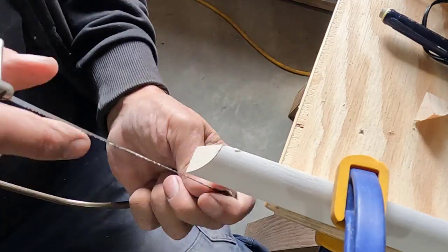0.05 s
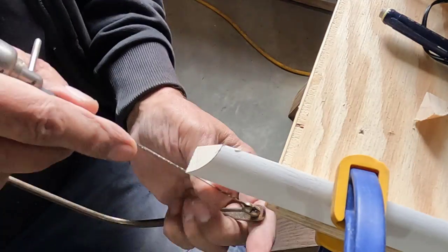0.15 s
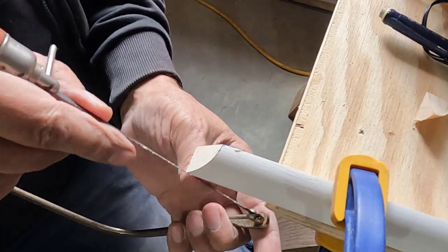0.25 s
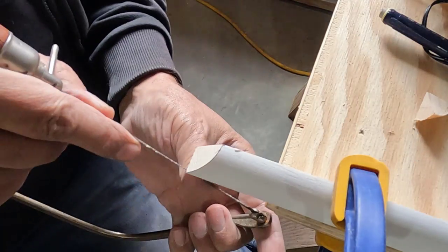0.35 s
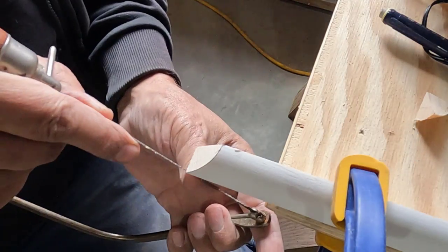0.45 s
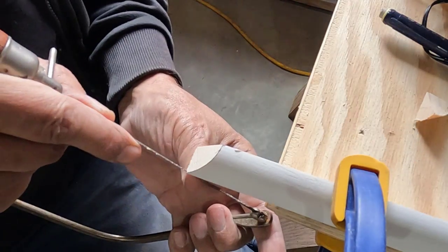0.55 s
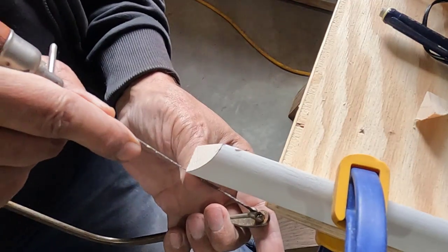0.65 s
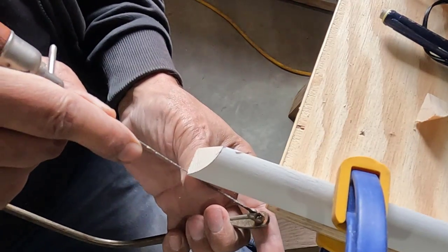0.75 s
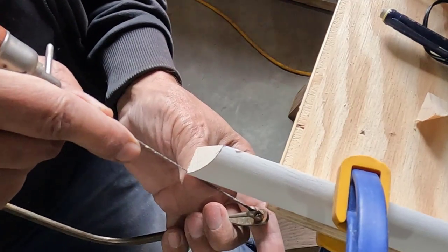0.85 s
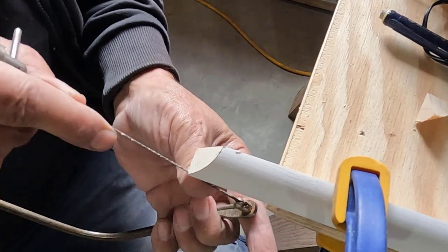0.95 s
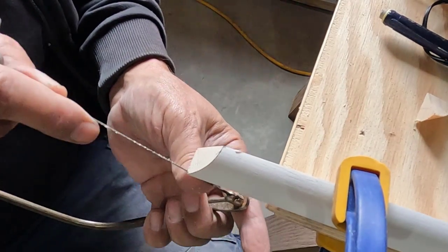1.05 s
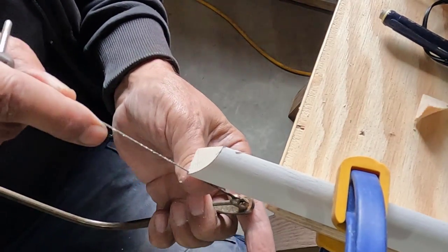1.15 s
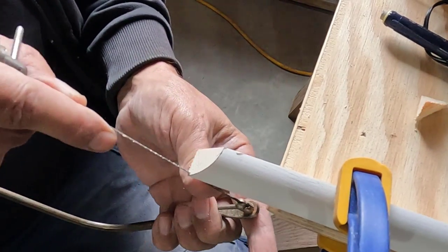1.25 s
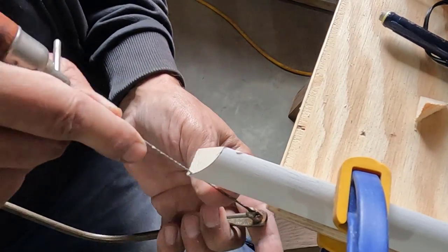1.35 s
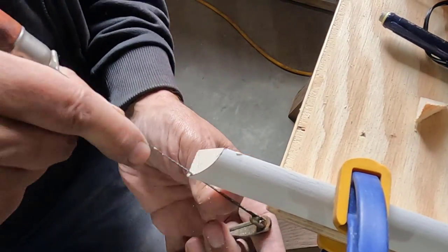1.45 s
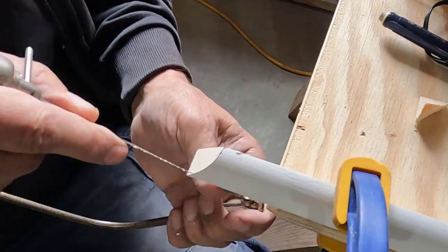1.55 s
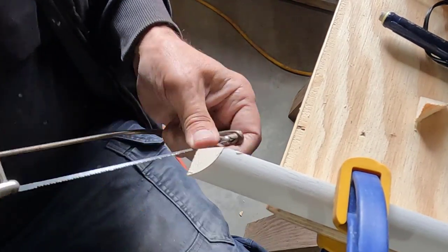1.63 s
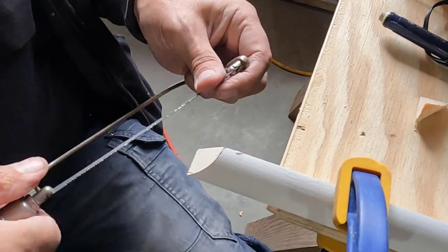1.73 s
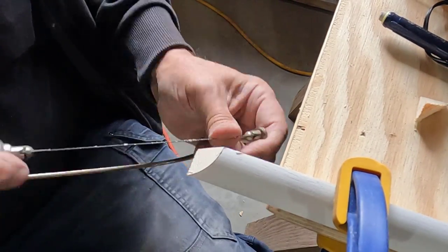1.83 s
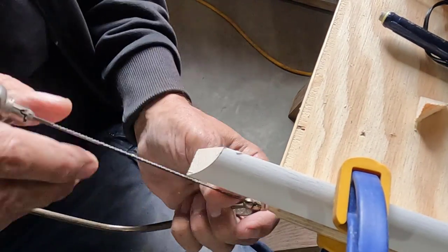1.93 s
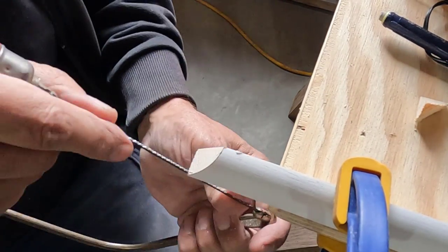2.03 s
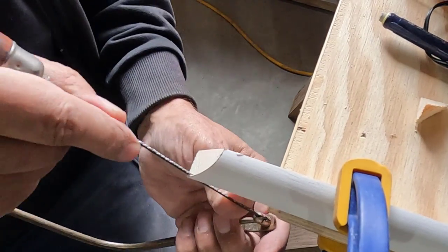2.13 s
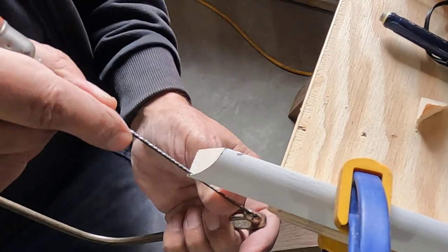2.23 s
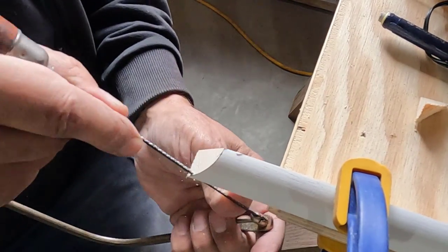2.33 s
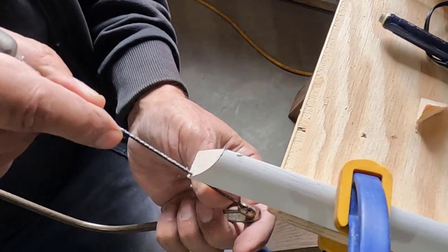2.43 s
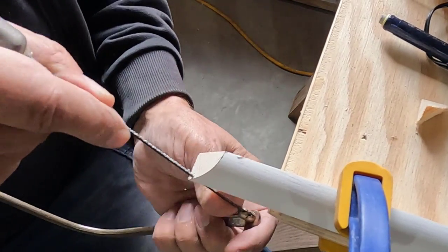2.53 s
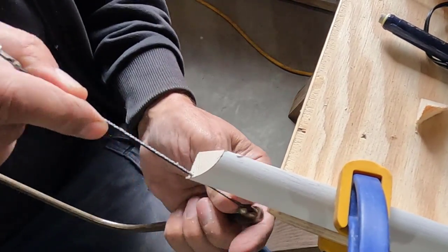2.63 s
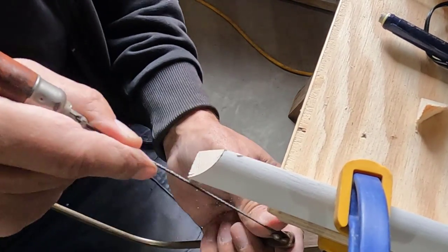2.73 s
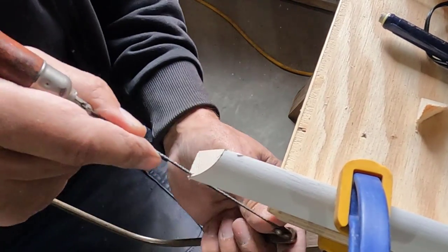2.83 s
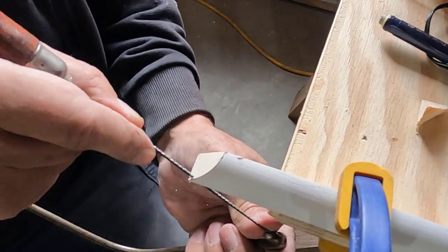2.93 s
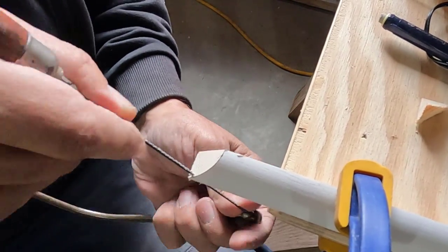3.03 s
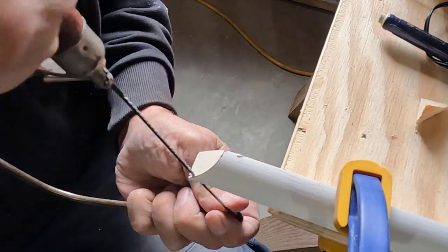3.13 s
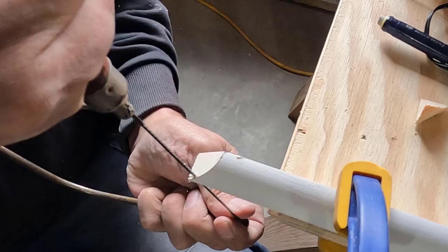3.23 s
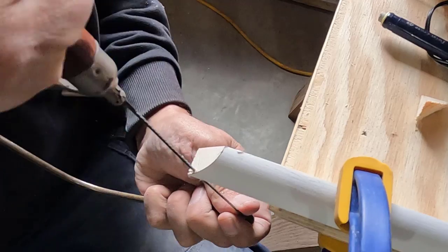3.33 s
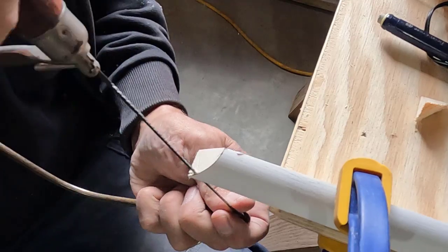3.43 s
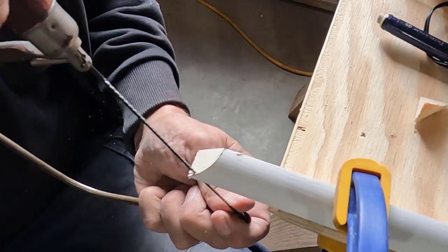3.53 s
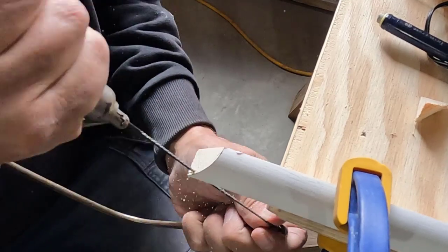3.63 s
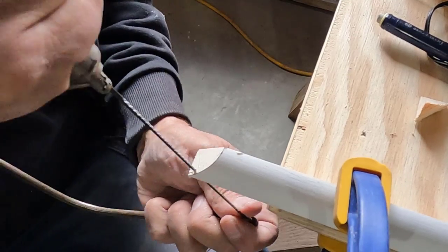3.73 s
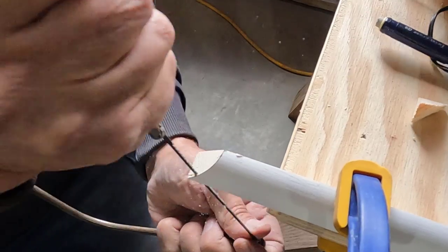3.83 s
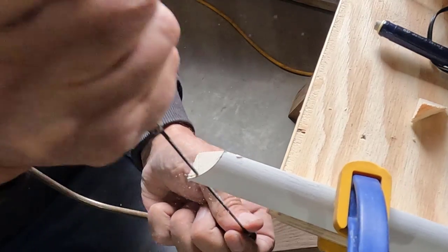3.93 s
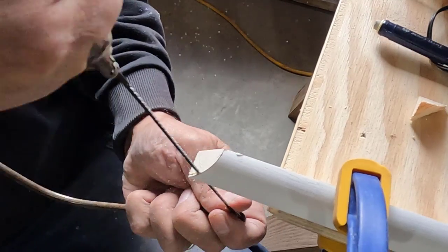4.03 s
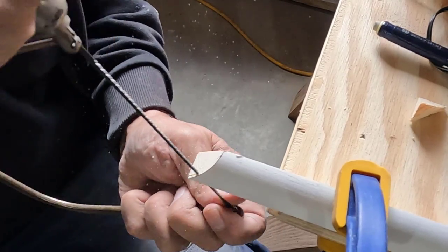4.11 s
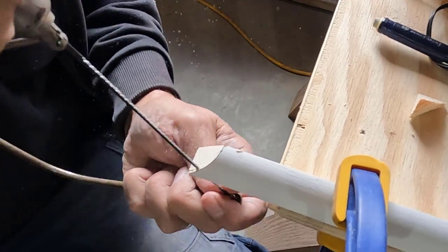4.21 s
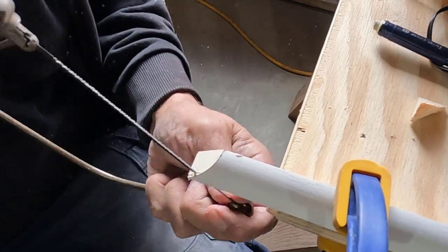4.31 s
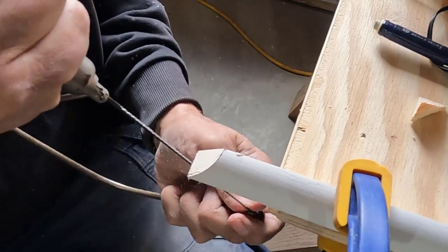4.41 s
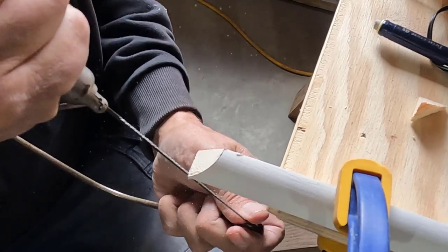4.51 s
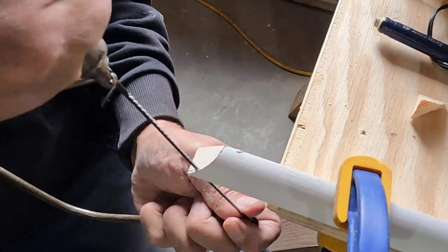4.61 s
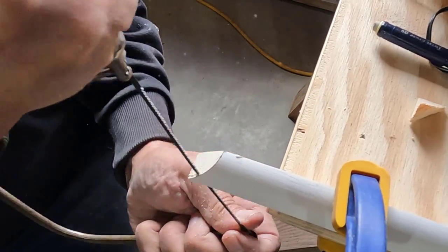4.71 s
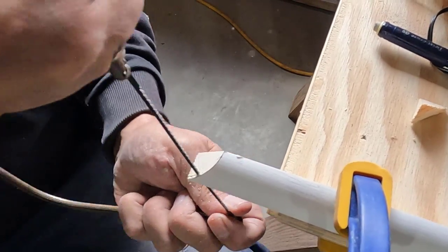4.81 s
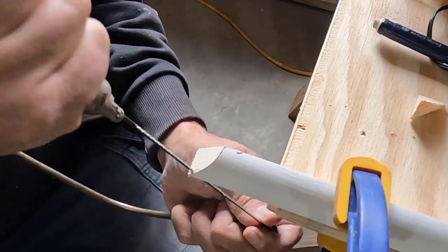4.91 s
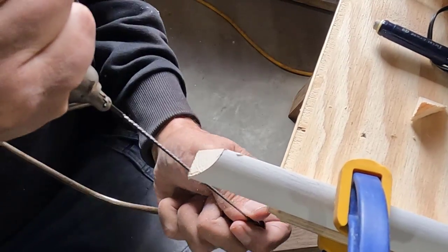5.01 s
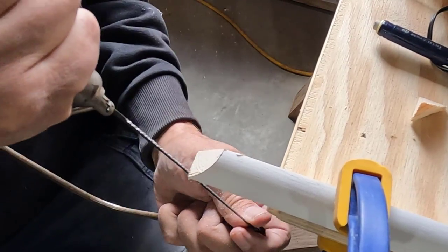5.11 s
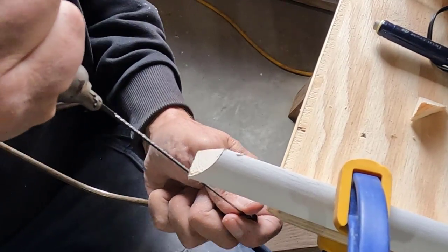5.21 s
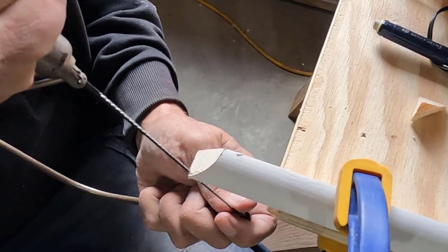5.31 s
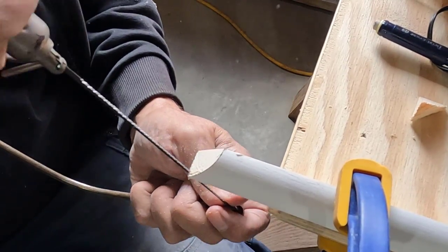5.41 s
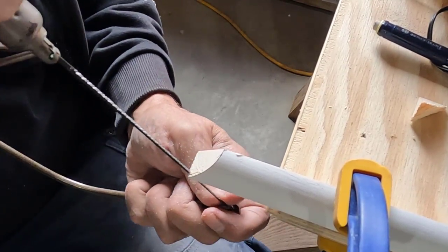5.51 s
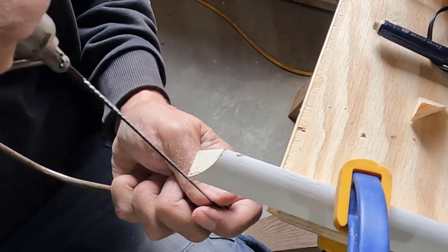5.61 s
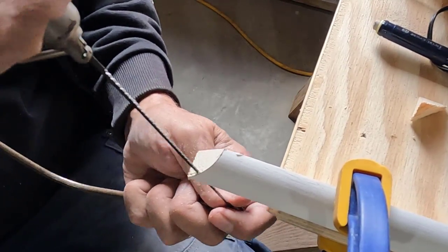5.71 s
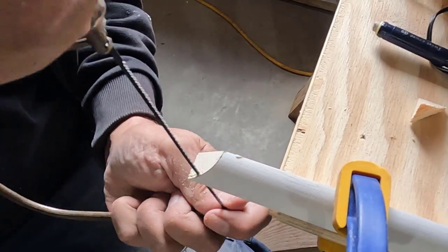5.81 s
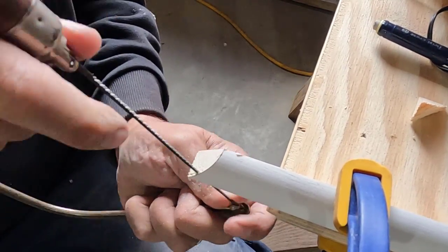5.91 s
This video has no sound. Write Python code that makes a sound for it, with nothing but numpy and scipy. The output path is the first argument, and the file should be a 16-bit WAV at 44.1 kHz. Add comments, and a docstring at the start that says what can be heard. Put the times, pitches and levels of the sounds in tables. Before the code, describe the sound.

Irregular, gritty strokes of a thin coping saw catching and slipping on wooden trim, with faint sleeve rustle in a quiet workshop.

```python
"""In a quiet workshop, a coping saw cuts the end of a clamped wooden trim piece in short, uneven strokes.
The teeth catch and slip: they shake the wood, make it ring with a rasp and tear its fibres.
Now and then one tooth snags and breaks free with a knock and a tick.
Between strokes the blade slides lightly and squeaks, and sleeves rustle as the arms move."""
import sys
import numpy as np
from scipy import signal
from scipy.fft import rfft, irfft, next_fast_len
from scipy.io import wavfile
from scipy.ndimage import map_coordinates

SR = 44100
rng = np.random.default_rng(int(sys.argv[2]) if len(sys.argv) > 2 else 0)


def log_audio(samples):
    """Write samples as a 16-bit WAV file to the path given in sys.argv[1]."""
    # one column per channel
    frames = np.atleast_2d(samples).T
    # limit to full scale, then quantise
    limited = np.clip(frames, -1, 1)
    pcm = np.round(limited * 32767).astype(np.int16)
    wavfile.write(sys.argv[1], SR, pcm)


N = 262836


def amp(db):
    return 10 ** (np.asarray(db) / 20)


def unit(x):
    return x / np.sqrt(np.mean(x ** 2) + 1e-20)


def add(track, start_s, sound):
    """Mix a sound into a track at a given time."""
    start = max(round(start_s * SR), 0)
    part = track[start:start + len(sound)]
    part += sound[:len(part)]


def along(points, hz):
    """Read between the (pitch_hz, value) rows of a table, on a log pitch scale."""
    pitches, values = np.transpose(points)
    return np.interp(np.log(hz + 1), np.log(pitches + 1), values)


def wobble(per_s):
    """A smooth curve through per_s random points a second."""
    return map_coordinates(rng.standard_normal(int(N * per_s / SR) + 4), [np.arange(N) * per_s / SR])


def filtered(x, gain_at):
    """Turn each frequency up or down by gain_at(hz)."""
    size = next_fast_len(N + SR // 4)
    return irfft(rfft(x, size) * gain_at(np.fft.rfftfreq(size, 1 / SR)), size)[..., :N]


def band(hz, low_hz, high_hz, order=10):
    """A gain that fades away outside two pitches."""
    return ((1 + (low_hz / (hz + 1)) ** order) * (1 + (hz / high_hz) ** order)) ** -.5


def swells(rows):
    """A loudness curve with one smooth bump for each row."""
    t = np.arange(N) / SR
    return sum(amp(db) * np.exp(-((t - middle_s) / half_s) ** 2 / 2) for middle_s, half_s, db in rows)


# The tone of rubbing, from bass to treble: pitch_hz, relative_db
RUB_TONE = [(15, -36), (25, -13), (48, -13.5), (118, -4.5), (175, -2), (366, -2.5), (418, -4), (766, -8),
            (2200, -13.5), (2570, -14.5), (4130, -21), (6130, -28), (9100, -43.5), (11200, -35),
            (13500, -48.5)]
def rub(low_hz, high_hz, grain_db, grains_per_s):
    """Surfaces rubbing together make a grainy noise."""
    grains = rng.standard_normal(N) * amp(grain_db * wobble(grains_per_s))
    return unit(filtered(grains, lambda hz: amp(along(RUB_TONE, hz)) * band(hz, low_hz, high_hz)))


# How loud the moving hands and arms are: time_s, sleeve_db, rubbing_db
ARM_MOVES = [(0.18, -60, -60), (0.6, -58.5, -60.5), (1.02, -53.5, -58), (1.19, -59.5, -54.5),
             (1.64, -55.5, -62), (2.06, -55.5, -58), (2.45, -55, -52.5), (2.95, -55.5, -58.5),
             (3.5, -51, -55), (3.75, -49.5, -47.5), (3.9, -44.5, -46.5), (4.28, -48, -51.5),
             (4.46, -52, -54), (4.9, -49, -54.5), (5.07, -54, -58), (5.46, -48.5, -52.5),
             (5.65, -54, -64.5), (5.96, -53, -53)]
def arm_levels():
    """Two level curves, for sleeves and rubbing, that rise and fall as the arms move."""
    time_s, *levels = np.transpose(ARM_MOVES)
    return [np.interp(np.arange(N) / SR, time_s, db) for db in levels]


# A sleeve brushes past the body: middle_s, half_length_s, level_db
SLEEVE_BRUSHES = [(.06, 0.057, -46), (4.29, .06, -47), (4.62, 0.027, -49), (5.87, 0.043, -50.5)]
def sleeves(sleeve_db):
    """Cloth rustles over the low rumble of the moving arms."""
    rustle = np.hypot(amp(sleeve_db), swells(SLEEVE_BRUSHES)) * rub(130, 676, grain_db=1, grains_per_s=67)
    rumble = amp(sleeve_db - 5.5) * rub(15, 210, grain_db=1, grains_per_s=4.91)
    return rustle + rumble


# The blade skids over the wood: middle_s, half_length_s, hiss_db
BLADE_SKIDS = [(.06, 0.055, -57), (0.706, .03, -68.5), (1.681, 0.0446, -58.5), (1.803, 0.0265, -58.5),
               (1.989, 0.076, -66), (2.589, .04, -67.5), (2.9, 0.078, -65.5), (3.142, 0.0098, -57),
               (3.19, 0.0316, -61.5), (4.372, 0.036, -62.5), (4.783, 0.0167, -58.5), (5.209, .03, -63),
               (5.493, 0.031, -69), (5.648, 0.046, -61.5), (5.95, 0.044, -58.5)]
def skids(rubbing_db):
    """The blade rubs and skids without biting: a woody scuff with a hiss on top."""
    skid = swells(BLADE_SKIDS)
    scuff_level = np.hypot(amp(rubbing_db - 0.36), amp(4.5) * skid)
    hiss_level = np.hypot(amp(rubbing_db - 14.5), skid)
    scuff = scuff_level * rub(813, 3820, grain_db=1.6, grains_per_s=860)
    hiss = hiss_level * rub(3860, 11940, grain_db=2, grains_per_s=900)
    return scuff + hiss


# Light slides of the blade: middle_s, half_length_s, pitch_hz, glide_hz_per_s, width_hz, level_db
BLADE_SLIDES = [(0.047, 0.036, 6460, 0, 900, -61), (0.81, 0.034, 2690, 25, 1400, -54.5),
                (1.666, .08, 2230, 1201, 200, -57), (1.67, 0.042, 4032, 1500, 300, -60.5),
                (2.403, 0.028, 3150, 0, 1000, -44.5), (3.02, 0.0188, 2759, 0, 1100, -49),
                (3.609, 0.024, 2785, 0, 500, -49), (4.42, 0.0075, 3500, 0, 1000, -42.5),
                (4.462, 0.015, 3354, 0, 1200, -49), (5.381, 0.028, 2950, 0, 1100, -59.5),
                (5.463, .02, 5300, 0, 400, -64), (5.904, 0.037, 4976, 11000, 300, -61)]
def squeaks():
    """The sliding blade sings; the pitch can glide as its free length changes."""
    out = np.zeros(N)
    for middle_s, half_s, pitch_hz, glide, width_hz, db in BLADE_SLIDES:
        t = np.arange(max(-middle_s, -3 * half_s), 3 * half_s, 1 / SR)
        smoothing = signal.butter(2, width_hz / 2, fs=SR, output="sos")
        flutter = signal.sosfilt(smoothing, rng.standard_normal((2, SR)))[:, :len(t)]
        phase = 2 * np.pi * (pitch_hz * t + glide * t * t / 2)
        squeak = unit(flutter[0] * np.cos(phase) + flutter[1] * np.sin(phase))
        add(out, middle_s + t[0], amp(db) * np.exp(-(t / half_s) ** 2) * squeak)
    return out


# The notes at which the clamped trim and the bench ring: pitch_hz, width_hz, relative_db
WOOD_NOTES = [(89.3, 39, 0.5), (123.9, 146, -2.5), (162, 43, -10.5), (221, 43, -1.5), (299.6, 45, -4),
              (367.6, 177, -3.5), (429.2, 13.6, -14), (482, 82, -5.5), (537.3, 36.6, -6.5),
              (617.5, 72, -10), (713, 204, -16), (996.8, 70, -14), (1046.3, 46.5, -16.5),
              (1076.9, 94, -12.5), (1136, 99, -16.5), (1180, 170, -18.5), (1330, 225, -20.5),
              (1510, 176, -13.5), (1653, 160, -14), (1736, 32, -15.5), (1802, 57, -15), (1923.7, 93, -14.5),
              (1940, 44, -16), (2032, 104, -14), (2150, 17, -14.5), (2297, 92, -19.5)]
# The notes at which the blade and saw frame ring: pitch_hz, width_hz, relative_db
STEEL_NOTES = [(2665.4, 380, -23.5), (3043, 137, -22), (3440, 230, -27), (4120, 710, -34.5),
               (4650, 480, -32), (5240, 43, -32.5), (5940, 1030, -39.5), (7100, 852, -35),
               (8100, 150, -36.5), (11503, 2090, -46.5), (12541, 322, -61.5)]
def ring(low_hz, high_hz, vary_db=2.5, detune=0.01225, size=4096):
    """Wood and steel ring when a tooth hits; the notes shift as the point of contact moves."""
    hz = np.fft.rfftfreq(size, 1 / SR) + 1
    pitch, width, db = np.array([*WOOD_NOTES, *STEEL_NOTES]).T[:, :, None]
    width = np.hypot(width, 0.022 * pitch)  # hands and clamp deaden the ring
    pitch = pitch * np.exp(detune * rng.standard_normal(pitch.shape))
    db = db + vary_db * rng.standard_normal(db.shape)
    notes = amp(db) / (1 + ((hz * hz - pitch ** 2) / (hz * width)) ** 2)
    gain = np.linalg.norm(notes, axis=0) * band(hz, low_hz, high_hz)
    # turn the gains into a sound that comes after the hit, never before it
    cepstrum = irfft(np.log(np.maximum(gain, 1e-4 * gain.max())))
    cepstrum[1:size // 2] *= 2
    cepstrum[size // 2 + 1:] = 0
    return irfft(np.exp(rfft(cepstrum)))[:size // 2]


def catches(speed, per_s, scatter, spread_db, grit, clump_db):
    """Teeth give uneven pushes, about per_s a second at full speed, with gritty rubbing between."""
    gaps, sizes = rng.standard_normal((2, len(speed) // 8))
    travel = np.cumsum(speed) * per_s / SR
    caught_at = np.searchsorted(travel, np.cumsum(np.exp(scatter * gaps)))
    pushes = np.bincount(caught_at, amp(spread_db * sizes), len(speed) + 1)[:len(speed)]
    # the wood grain changes every few teeth
    hardness = map_coordinates(rng.standard_normal(len(gaps)), [travel / 4], order=1)
    return amp(clump_db * hardness) * (unit(pushes) + grit * rng.standard_normal(len(speed)))


def bites(rows, bands_hz, early_s, abruptness, **teeth):
    """Each bite swells and dies away while its catching teeth ring the wood and steel."""
    out = np.zeros(N)
    t = np.arange(-SR // 10, SR // 7) / SR
    rise_share = .4  # the part of a bite before its peak
    for peak_s, length_s, db in rows:
        from_peak = t / (length_s * np.where(t < 0, rise_share, 1 - rise_share))
        force = amp(-20 * (np.hypot(1, from_peak) - 1) ** abruptness)
        speed = .5 + .5 * np.sqrt(force)
        sound = sum(signal.fftconvolve(force * catches(speed, **teeth), ring(*hz)) for hz in bands_hz)
        add(out, peak_s + t[0] - early_s, amp(db) * sound * np.linalg.norm(force) / np.linalg.norm(sound))
    return out


# The blade bites into the wood: peak_s, length_s, strength_db, shake_db, tear_db
# (shaking and tearing are relative to the strength)
BLADE_BITES = [(0.766, 0.0201, -48, -4.5, -8.5), (0.813, 0.0298, -42, -5, -33.5),
               (.971, .024, -29.5, -2, -20), (0.992, .022, -31.5, -2, -15), (1.072, .028, -37.5, -2, -15),
               (1.138, 0.0176, -42.5, -5, -16), (1.16, 0.022, -49.5, 1.5, -22),
               (1.227, 0.026, -39, 5.5, -21.5), (1.265, 0.018, -37, 2.5, -15),
               (1.283, 0.019, -28.5, 0.5, -16), (1.393, 0.02844, -23.5, 2.5, -14.5),
               (1.442, 0.017, -44.5, -3, -10), (1.533, 0.021, -45.5, 1.5, -13),
               (1.613, 0.0417, -45, -7, -15.5), (2.091, .014, -50.5, -8, -19),
               (2.277, .029, -34.5, -3, -17.5), (2.339, 0.0081, -29.5, -3, -22),
               (2.353, 0.01726, -36.5, -2, -11), (2.386, .033, -30, -5.5, -22.5),
               (2.421, .033, -34, -2.5, -14), (2.484, 0.028, -40, -1.5, -22), (2.53, 0.02, -47.5, -1, -9),
               (2.657, 0.0197, -44.5, -6, -14), (2.718, 0.013, -40, -4, -8), (2.741, 0.021, -25, 3, -14.5),
               (2.762, 0.0304, -28, -14, -30), (2.989, 0.028, -44, -6, -17), (3.019, .031, -45.5, 2, -26),
               (3.064, 0.0365, -42, -1, -20), (3.249, 0.03107, -24, 4, -14),
               (3.296, 0.031, -29.5, -6, -14.5), (3.456, 0.035, -38, -1.5, -18),
               (3.526, 0.033, -33, 1.5, -33), (3.597, 0.027, -36, -6, -32.5), (3.698, 0.036, -26, 5, -13.5),
               (3.764, 0.026, -30.5, -6, -14), (3.847, .026, -23, -2.5, -15.5),
               (3.873, 0.054, -24.5, -5, -18), (3.924, .035, -23.5, 4.5, -19.5),
               (3.95, 0.026, -26, -8, -18), (4.028, 0.047, -26, 2, -20), (4.054, 0.038, -26.5, -5, -16),
               (4.13, .037, -42.5, -5, -25), (4.183, 0.026, -27, 0, -14), (4.294, 0.02803, -34, -4, -13.5),
               (4.434, 0.018, -22, -10, -18.5), (4.559, 0.039, -49, -20.5, -15),
               (4.665, .02, -44, -1.5, -18.5), (4.714, 0.036, -33.5, -2, -21), (4.85, 0.033, -31, 5, -16.5),
               (5.022, .047, -26.5, -3, -13.5), (5.249, .022, -42.5, -2, -14.5),
               (5.32, 0.026, -38, -2.5, -19), (5.366, 0.0289, -41.5, -23, -23.5),
               (5.498, 0.045, -40, -8, -21), (5.552, 0.0261, -41.5, -5.5, -16.5),
               (5.806, 0.025, -49.5, -5.5, -14.5)]
def sawing():
    """Slow slips shake the clamped wood, single teeth rasp, and torn fibres crackle."""
    peak_s, length_s, strength_db, shake_db, tear_db = np.transpose(BLADE_BITES)
    extra_db = strength_db + 30.5  # above a middling bite; harder bites thump less and judder more
    thump_db = strength_db + 1.507 * shake_db - 0.17 * extra_db
    judder_db = strength_db + shake_db + 0.14 * extra_db
    # the whole piece sways for part of each bite, and the slips keep time with it
    thump = bites(zip(peak_s, 0.79 * length_s, thump_db), [(45, 242)], early_s=0.00507, abruptness=0.98,
                  per_s=172, scatter=.07, spread_db=2, grit=.3, clump_db=.5)
    judder = bites(zip(peak_s, length_s, judder_db), [(250, 864)], early_s=0.001913, abruptness=0.9956,
                   per_s=340, scatter=.4, spread_db=2.5, grit=0.47, clump_db=-1.14)
    # the freed blade scrapes on just after each snag (listed below)
    run_ons = [(start_s + 0.02, .042, knock_db - 24.5) for start_s, knock_db, _ in TOOTH_SNAGS]
    scrapes = [*zip(peak_s, length_s, strength_db), *run_ons]
    rasp = bites(scrapes, [(800, 4900)], early_s=0.001173, abruptness=1.05,
                 per_s=520, scatter=.35, spread_db=2, grit=0.37, clump_db=1)
    fibres_hz = [(3600, 6200), (6200, 7700), (7700, 9500), (9500, 13000)]
    crackle = bites(zip(peak_s, length_s, strength_db + tear_db), fibres_hz, early_s=0.0006, abruptness=1.3,
                    per_s=700, scatter=0.49, spread_db=3.5, grit=1, clump_db=7)
    return amp(2) * thump + amp(1) * judder + amp(-1) * rasp + amp(-0.5) * crackle


# Single teeth snag and break free: start_s, knock_db, tick_db
TOOTH_SNAGS = [(0.965, -19.5, -37), (0.99, -23, -26), (1.067, -29.5, -37), (1.286, -25.5, -39),
               (1.385, -14, -23), (1.403, -13.5, -24), (2.278, -32, -32.5), (2.335, -28, -39.5),
               (2.736, -18, -39), (3.254, -11, -40.5), (3.702, -17, -28), (3.84, -15.5, -40.5),
               (4.436, -12, -22.5), (4.714, -21.5, -30), (4.851, -42, -31), (5.376, -25.5, -49)]
def snags():
    """A stuck tooth lets go: one hollow knock from the wood and a sharp tick from the blade."""
    out = np.zeros(N)
    for start_s, knock_db, tick_db in TOOTH_SNAGS:
        knock, tick = ring(500, 2160), ring(5200, 8300)
        add(out, start_s, amp(knock_db) * knock / np.abs(knock).max())
        add(out, start_s, amp(tick_db) * tick / np.abs(tick).max())
    return out


# How long the room's echo takes to fade by 60 dB: pitch_hz, fade_s
ECHO_FADES = [(150, 0.0317), (1500, 0.15), (10000, 0.092)]
def room_echo(sound):
    """Bench, floor and walls throw back a short, blurred echo."""
    hz, t, noise = signal.stft(rng.standard_normal(SR // 2), SR, nperseg=256)
    fade = amp(-60 * t / along(ECHO_FADES, hz)[:, None])
    tail = signal.istft(noise * fade, SR, nperseg=256)[1]
    return signal.fftconvolve(sound, tail / np.linalg.norm(tail))[:N]


# How much left and right differ, against what they share: pitch_hz, side_db
STEREO_WIDTH = [(300, -79.5), (1000, -67), (2000, -62), (4000, -32.5), (8000, -22), (12000, -9.5)]
def stereo(middle):
    """Nearly mono, with a slight stereo spread in the treble."""
    blur = rng.standard_normal(SR // 80)
    blurred = signal.fftconvolve(middle, blur / np.linalg.norm(blur))[:N]
    side = filtered(blurred, lambda hz: amp(along(STEREO_WIDTH, hz)))
    return np.array([middle + side, middle - side])


def scene():
    """The saw and its faint echo, over rustling sleeves and the skidding blade."""
    saw = sawing() + snags() + squeaks()
    echo = amp(-16.5) * room_echo(saw)
    sleeve_db, rubbing_db = arm_levels()
    return stereo(saw + echo + sleeves(sleeve_db) + skids(rubbing_db))


def record(dry):
    """Cut away the deepest rumble and the highest treble."""
    return filtered(dry, lambda hz: band(hz, 15, 13300, order=80))


dry = scene()
out = record(dry)
log_audio(out)
```